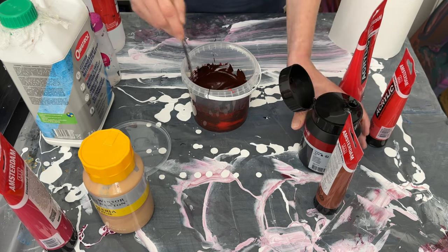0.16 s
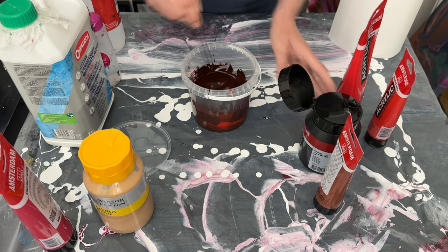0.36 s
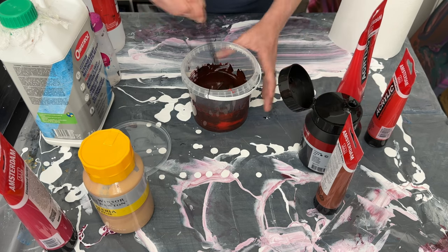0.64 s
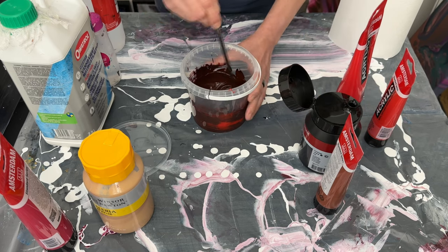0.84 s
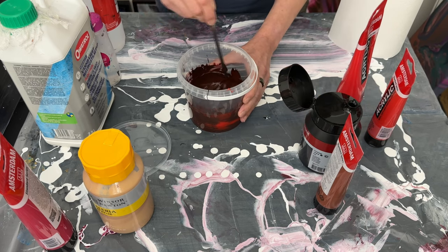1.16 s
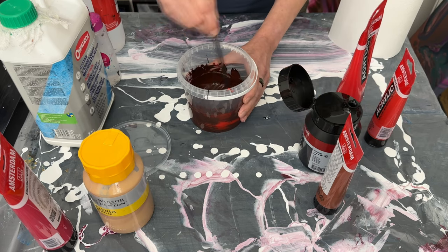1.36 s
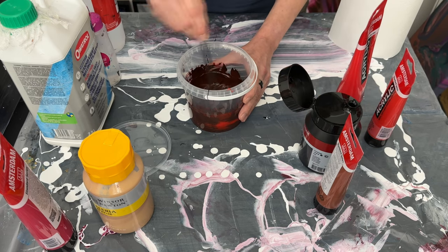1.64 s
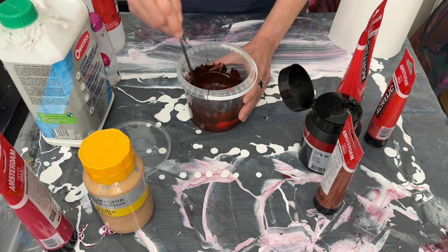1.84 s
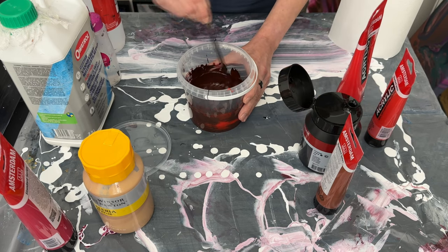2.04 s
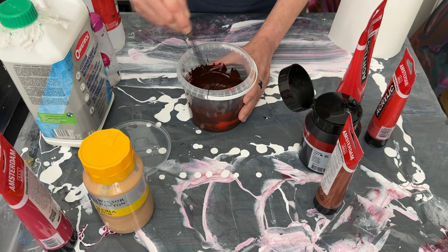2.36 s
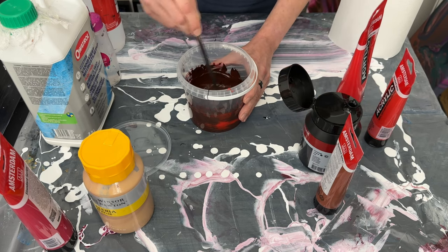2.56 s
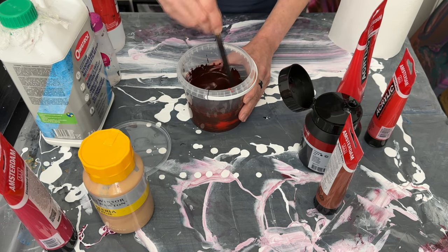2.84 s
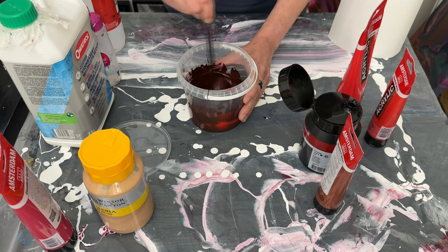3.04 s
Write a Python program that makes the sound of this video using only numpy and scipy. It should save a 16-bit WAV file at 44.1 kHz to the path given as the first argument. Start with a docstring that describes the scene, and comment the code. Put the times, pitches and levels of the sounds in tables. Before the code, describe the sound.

Thick paint is stirred in a plastic tub, close to the microphone in a small room. Irregular hollow knocks and light scrapes from the stick mix with sticky crackles, tiny pops and soft thuds of the tub against a table.

```python
"""Hollow, uneven knocks and wet smacks: a stick stirs thick paint in a thin plastic tub on a table.
The stick knocks on the wall and bottom, making tub and stick ring, and scrapes between knocks.
The paint squelches under the stick, smacks and crackles as it tears, and its air pockets pop.
The tub thumps the table, and the knocks set the things on it ringing faintly.
A small room adds a short echo and a low rumble."""
import sys
import numpy as np
from scipy import signal
from scipy.fft import rfft, irfft, next_fast_len
from scipy.io import wavfile
from scipy.ndimage import map_coordinates

SR = 44100
rng = np.random.default_rng(int(sys.argv[2]) if len(sys.argv) > 2 else 0)


def output_pcm(signal):
    """Save a mono or channel-first signal as 16-bit PCM at the path in sys.argv[1].

    Samples are clipped to [-1, 1] before scaling.
    """
    pcm = np.clip(np.atleast_2d(signal).T, -1, 1) * 32767
    wavfile.write(sys.argv[1], SR, np.round(pcm).astype(np.int16))


N = 141120  # 3.2 seconds

# The tones of the tub, the stick and the things on the table. Fade time is the time to drop 60 dB.
# (pitch [Hz], relative level [dB], fade time [s])
TUB_TONES = [(272, 1.5, 0.023), (385, 2, 0.032), (469.5, 3.5, 0.032), (600, 1, 0.027), (696.7, 2, 0.039),
             (889, -1, 0.026), (1053, 3.5, 0.022), (1218, 6, 0.012)]
STICK_TONES = [(1790, 4.5, 0.014), (1952, 4.5, 0.015), (2385, -5, 0.017), (2840, -4, 0.008),
               (3126, -10, 0.024), (4350, -21, 0.004)]
THINGS_TONES = [(180, -11, 0.43), (431, -11.5, 0.23), (494.7, -2.5, .16), (1020, -7, 0.16), (1146, 1, 0.15),
                (1232, 4, 0.1), (1980, -20, .14), (2980, -31, 0.2)]
# Tone colour of the tick in each knock (frequency [Hz], relative level [dB])
TICK_COLOUR = [(500, -11), (1500, -21), (3000, 6.5), (4400, -0.5), (5500, -16), (8000, -18), (15000, -52)]
# The stick hits the tub, favouring the tones near a centre pitch
# (time [s], tub level [dB], stick level [dB], tub centre [Hz], stick centre [Hz])
KNOCKS = [(.003, -53.5, -54.5, 716, 1900), (0.1766, -39.5, -58.5, 625, 2020), (.358, -47, -55, 670, 2180),
          (.519, -40.5, -52.5, 630, 2600), (.734, -47, -56, 632, 2180), (0.812, -54.5, -59.5, 703, 2950),
          (.847, -51, -82, 680, 2280), (.865, -50.5, -61, 710, 2190), (0.9157, -41, -42.5, 630, 2090),
          (.932, -44, -60, 1004, 2200), (1.116, -52, -54.5, 620, 3200), (1.17, -53, -77, 747, 2830),
          (1.194, -35, -39.5, 926, 2340), (1.212, -39, -53, 830, 2780), (1.222, -40.5, -55, 750, 2340),
          (1.337, -69, -60, 930, 2500), (1.356, -54, -57.5, 920, 2650), (1.391, -51, -82, 740, 2650),
          (1.4751, -32, -36, 950, 2180), (1.484, -36, -41.5, 720, 2700), (1.588, -45.5, -58, 700, 2050),
          (1.607, -44, -52, 740, 2130), (1.667, -51.5, -58, 645, 2110), (1.9194, -40.5, -48.5, 724, 2130),
          (1.939, -38, -45.5, 692, 2650), (2.068, -42, -50.5, 746, 2180), (2.157, -37, -49.5, 656, 1980),
          (2.1882, -44, -51.5, 554, 2690), (2.218, -44.5, -50.5, 680, 2200), (2.3098, -36, -44, 680, 2450),
          (2.339, -47, -45.5, 420, 2890), (2.368, -35.5, -47, 860, 2900), (2.463, -41.5, -49.5, 800, 2350),
          (2.572, -44, -66, 770, 1930), (2.707, -48.5, -61.5, 644, 2090), (2.7125, -48, -61, 850, 2190),
          (2.7822, -48.5, -52.5, 602, 2040), (2.89, -47, -55, 790, 2450), (2.96, -52.5, -54, 727, 2610),
          (3.147, -56, -66, 740, 2530)]
HARD_KNOCK_DB, STICK_ATTACK_S = -41, 0.00021


def knocks():
    """Each knock rings tub and stick, with a tick the paint softens; hard ones shake things nearby."""
    rings, ticks = np.zeros((2, N))
    for start, tub_db, stick_db, tub_hz, stick_hz in KNOCKS:
        lighter_db = HARD_KNOCK_DB - tub_db
        attack_s = 0.00096 * np.exp(.05 * lighter_db)  # lighter knocks start more gently
        things_db = HARD_KNOCK_DB - 15 - 1.2 * lighter_db  # and hardly shake the things nearby
        tub = amp(tub_db + .5) * ring(TUB_TONES, attack_s, tub_hz, focus_db=7)
        things = amp(things_db) * ring(THINGS_TONES, attack_s=0.0018)
        stick = amp(stick_db - 3) * ring(STICK_TONES, STICK_ATTACK_S, stick_hz, focus_db=23.5)
        add(rings, start, tub + things + stick)
        add(ticks, start, amp(stick_db - 5) * soften(burst(fade_s=.02), STICK_ATTACK_S))
    return rings + coloured(ticks, TICK_COLOUR)


def ring(tones, attack_s, centre_hz=1000, focus_db=0):
    """A struck object rings with fading tones, focus_db weaker for each octave away from centre_hz."""
    t = np.arange(SR // 3) / SR
    hz, db, fade_s = np.transpose(tones)[:, :, None]
    spot, flex = rng.standard_normal((2, len(tones), 1))  # each hit lands on a slightly different spot
    gain = amp(db + 1.5 * spot - focus_db * np.abs(np.log2(hz / centre_hz)))
    hz = hz * (1 + .05 * flex * (fade_s < .15))  # short tones shift as the plastic flexes
    waves = np.sin(2 * np.pi * (hz * t + rng.random(hz.shape)))
    sound = soften(np.sum(gain * fade(t, fade_s) * waves, axis=0), attack_s)
    return sound / np.sqrt(np.sum(sound ** 2) / (.01 * SR))  # same total energy every time


# The tub rocks and bumps the table (time [s], level [dB], pitch at the loudest point [Hz])
THUMPS = [(0.178, -47, 265), (.369, -45, 265), (0.52, -37, 254), (.736, -46, 207), (.819, -44, 179),
          (0.848, -42, 200), (0.915, -43.5, 282), (0.948, -43.5, 197), (1.118, -45.5, 176),
          (1.195, -38.5, 236), (1.22, -35.5, 223), (1.338, -40.5, 189), (1.481, -37.5, 200),
          (1.613, -46.5, 225), (1.673, -46.5, 218), (1.923, -41.5, 203), (1.941, -36.5, 201),
          (2.076, -44, 217), (2.162, -46.5, 218), (2.226, -40, 180), (2.314, -38, 221), (2.377, -37, 200),
          (2.469, -43, 275), (2.787, -47, 230), (2.8, -44, 169)]
THUMP_RISE_S, THUMP_SAG_PER_S = 0.0036, 11


def thumps():
    """Pushed by the stick, the full tub bumps the table: a short thud that sinks as the tub settles."""
    track, t = np.zeros(N), np.arange(SR // 16) / SR
    swell = (t / THUMP_RISE_S * np.exp(1 - t / THUMP_RISE_S)) ** 2
    sag = np.exp(-THUMP_SAG_PER_S * (t - THUMP_RISE_S))
    for start, db, hz in THUMPS:
        cycles = hz * np.cumsum(sag) / SR
        add(track, start, amp(db + 1) * swell * np.sin(2 * np.pi * (cycles + rng.random())))
    return track


# How loudly the stick scrapes (time [s], level [dB])
SCRAPE_LEVEL = [(0, -57), (.15, -62.5), (.4, -59), (.65, -64.5), (.85, -62), (1.05, -77), (1.4, -58),
                (1.62, -62.5), (1.75, -68), (1.88, -70.5), (2.1, -63), (2.3, -62.5), (2.55, -72.5),
                (2.8, -70), (3.08, -72.5), (3.2, -66)]
# Tone colour of the scraped plastic (frequency [Hz], relative level [dB])
SCRAPE_COLOUR = [(100, -25.5), (200, 5.5), (450, -6.5), (700, 2), (900, -11.5), (1200, 0.5), (1550, -4.5),
                 (2000, -6), (2800, -13.5), (4000, -14.5), (8000, -26), (16000, -30.5)]


def scrape():
    """The stick slips along the plastic in tiny jerks."""
    slips = grains(per_s=1800, spread_db=4, clump_db=3, clumps_per_s=30)
    return amp(curve(SCRAPE_LEVEL) - 1.5) * coloured(slips, SCRAPE_COLOUR)


# The stick drags hard along the wet wall (time [s], length [s], level [dB], pitch of the hollow [Hz])
DRAGS = [(0.916, .04, -49.5, 2430), (1.202, .022, -49.5, 2100), (1.778, 0.043, -60, 2450),
         (2.043, .06, -58.5, 2050), (2.314, .02, -51, 2700), (2.35, 0.034, -47.5, 2750),
         (2.65, 0.032, -61, 2040), (2.879, 0.077, -55, 2580), (3.152, 0.025, -61.5, 2420)]
# Tone colour of squeezed paint (frequency [Hz], relative level [dB])
SQUELCH_COLOUR = [(400, -3.5), (800, 11.5), (1200, 4), (1550, 3), (1950, 6), (2600, 1.5), (3400, -7),
                  (4300, -13), (5200, -10), (10000, -25.5), (16000, -28)]


def squelches():
    """Pressed to the wall, the stick squeezes out paint; the hollow left behind it adds a pitch."""
    track = np.zeros(N)
    slips = grains(per_s=6000, spread_db=3, clump_db=2.5, clumps_per_s=140)
    squeeze = coloured(slips, SQUELCH_COLOUR)
    for start, length, db, hz in DRAGS:
        stroke = squeeze[round(start * SR):][:int(length * SR) + 2]
        hollow = amp(1.5) * signal.lfilter(*signal.iirpeak(hz, Q=5.8, fs=SR), stroke)
        add(track, start, amp(db) * unit(stroke + hollow) * signal.windows.tukey(len(stroke), .5))
    return track


# How loudly the paint crackles (time [s], level [dB])
CRACKLE_LEVEL = [(0, -58), (.2, -86), (.65, -114), (.8, -73), (.93, -52.5), (1.03, -69), (1.2, -66),
                 (1.3, -82), (1.45, -61), (1.6, -74), (1.85, -74), (2.1, -88), (2.24, -92), (2.52, -84),
                 (2.68, -68), (2.85, -66), (2.93, -61), (3.05, -70), (3.2, -67)]
# Single wet smacks (time [s], level [dB], centre pitch [Hz])
SMACKS = [(0.022, -51, 6300), (0.0875, -43.5, 10500), (0.121, -48, 11000), (0.167, -45, 6100),
          (0.1882, -40, 9200), (0.3366, -43.5, 6400), (0.72, -43, 6750), (0.729, -34.5, 8160),
          (0.8111, -43, 6600), (0.8646, -44, 11000), (0.917, -37.5, 9700), (1.1136, -39.5, 9700),
          (1.3565, -36, 9600), (1.4743, -39, 9400), (1.651, -46, 7300), (1.906, -30.5, 9140),
          (2.1933, -37.5, 6420), (2.2162, -32, 7000), (2.243, -40, 6750), (2.3692, -30.5, 10700),
          (2.673, -47.5, 9000), (2.727, -43.5, 6600), (2.7663, -49.5, 9860), (2.901, -44, 6730),
          (2.933, -38.5, 10100), (3.126, -46, 11000), (3.157, -45, 6540)]
# Tone colour of tearing paint (frequency [Hz], relative level [dB])
PAINT_COLOUR = [(1000, -10), (3000, -8), (6500, 3), (8000, -6), (9600, 5.5), (11500, -3), (13000, -0.5),
                (16000, 4)]


def tearing_paint():
    """Thin films of paint tear: single smacks, each with its own colour, over a fine crackle."""
    crackle = grains(per_s=600, spread_db=8, clump_db=3, clumps_per_s=50)
    track = amp(curve(CRACKLE_LEVEL) - 7.5) * crackle
    for start, db, hz in SMACKS:
        tear = soften(burst(fade_s=.005), attack_s=.0007)
        smack = signal.lfilter(*signal.iirpeak(hz, Q=1.7, fs=SR), tear)
        add(track, start, amp(db + 1.5) * smack)
    return coloured(track, PAINT_COLOUR)


# Air pockets pop in the paint (time [s], pitch [Hz], level [dB])
POCKETS = [(0.342, 1940, -35.5), (0.721, 2650, -45), (0.729, 3640, -40.5), (0.915, 2060, -55),
           (1.063, 783, -41.5), (1.116, 2660, -37.5), (1.214, 4030, -33.5), (1.786, 2400, -42.5),
           (1.897, 9670, -41.5), (2.088, 1940, -36.5), (2.188, 4140, -40.5), (2.339, 4200, -35),
           (2.366, 4060, -33), (2.909, 2990, -33.5)]
POCKET_RISE_PER_S, POCKET_ROUGHNESS = 3.3, .4


def air_pockets():
    """A small pocket opens and rings for a moment, rough and slightly rising in pitch."""
    track, t = np.zeros(N), np.arange(SR // 16) / SR
    shape = soften(fade(t, fade_s=.011), attack_s=.00069)
    for start, hz, db in POCKETS:
        flutter = POCKET_ROUGHNESS * rng.standard_normal(len(t))
        phase = 2 * np.pi * hz * np.cumsum(1 + POCKET_RISE_PER_S * t + flutter) / SR
        add(track, start, amp(db) * shape * np.sin(phase))
    return track


# Echoes off the table and bottles (delay [s], left gain [ratio], right gain [ratio])
ECHOES = [(.0045, -0.031, -0.29), (.0088, -0.022, 0.037), (0.0131, -0.21, 0.22), (0.0195, -0.11, -0.082)]
# How much louder the left ear hears the tub (frequency [Hz], level above the right ear [dB])
LEFT_LOUDER = [(200, -1), (500, 2.2), (1000, 2.5), (2000, 3), (4000, 7.5), (8000, 7.5), (14000, -2.5)]
LEFT_LEAD_S = .000015


def close_sound(x):
    """The sound reaches the left ear just before the right, and bounces off nearby surfaces."""
    side = np.array([[1], [-1]])

    def response(hz):
        delay = lambda seconds: np.exp(-2j * np.pi * hz * seconds)
        direct = amp(side * along(LEFT_LOUDER, hz) / 2) * delay(-side * LEFT_LEAD_S / 2)
        echoes = sum(np.array([[left], [right]]) * delay(lag) for lag, left, right in ECHOES)
        return direct * (1 + echoes)
    return filtered(np.array([x, x]), response)


# How long the room rings (frequency [Hz], fade time [s])
ROOM_FADE = [(150, 0.3), (700, 0.3), (2500, 0.24), (10000, 0.16)]
# Tone colour of the room's echo (frequency [Hz], relative level [dB])
ROOM_COLOUR = [(100, 2.5), (300, -11), (520, -6), (720, -5), (1200, -3), (2500, -6), (5000, 0), (12000, 1)]
# How alike that echo is in both ears (frequency [Hz], likeness [-1 to 1])
ROOM_LIKENESS = [(100, 0.95), (250, 0.96), (500, 0.41), (1000, -0.08), (2000, 0.45), (5000, -0.15),
                 (12000, 0.5)]


def room_echo(x):
    """Many reflections blur into a short, diffuse room tail."""
    echo, block = np.zeros((2, N)), SR // 11
    for first in range(0, N, block):
        hz, t, noise = signal.stft(rng.standard_normal((2, SR // 2)), SR, nperseg=256)
        shape = fade(t, along(ROOM_FADE, hz)[:, None]) * (1 - np.exp(-t / 0.0018))
        tail = signal.istft(noise * shape, SR, nperseg=256)[1]
        tail /= np.linalg.norm(tail[0])
        add(echo, first / SR, signal.fftconvolve(x[None, first:first + block], tail, axes=1))
    return stereo(echo, ROOM_COLOUR, ROOM_LIKENESS)


# Tone colour of the background noise (frequency [Hz], relative level [dB])
RUMBLE_COLOUR = [(20, -23), (33, -42), (44, 10), (68, 9), (90, -4.5), (125, 0.5), (160, -6.5), (300, -7.5),
                 (700, -16), (1500, -29), (3000, -25.5), (4500, -29.5), (7000, -24), (8000, -46),
                 (10000, -61), (16000, -40)]
# How alike that noise is in both ears (frequency [Hz], likeness [-1 to 1])
RUMBLE_LIKENESS = [(60, 0.96), (250, 0.89), (600, 0.17), (3000, 0.079), (10000, 0.13)]
RUMBLE_DB = -57.5


def room_rumble():
    """A steady low rumble with a faint hiss."""
    return amp(RUMBLE_DB) * unit(stereo(rng.standard_normal((2, N)), RUMBLE_COLOUR, RUMBLE_LIKENESS))


def amp(db):
    """Turn decibels into a number to multiply by."""
    return 10 ** (np.asarray(db) / 20)


def unit(x):
    """Scale a sound to an average (rms) strength of 1."""
    return x / np.sqrt(np.mean(x ** 2) + 1e-20)


def along(points, hz):
    """Read between (frequency, value) points on a log frequency scale."""
    frequencies, values = np.transpose(points)
    return np.interp(np.log(hz + 1), np.log(frequencies + 1), values)


def curve(points):
    """Join (time, value) points with straight lines, one value per sample."""
    return np.interp(np.arange(N) / SR, *np.transpose(points))


def fade(t, fade_s):
    """Fall by 60 dB every fade_s seconds."""
    return np.exp(-np.log(1000) * t / fade_s)


def soften(x, attack_s):
    """Round off the start of a sound."""
    return x * (1 - np.exp(-np.arange(len(x)) / SR / attack_s))


def burst(fade_s):
    """A short puff of dying noise."""
    t = np.arange(SR // 10) / SR
    return rng.standard_normal(len(t)) * fade(t, fade_s)


def grains(per_s, spread_db, clump_db, clumps_per_s):
    """Tiny random clicks of uneven size, in louder and quieter clumps."""
    clicks = (rng.random(N) < per_s / SR) * rng.choice([-1, 1], N)
    sizes = np.clip(rng.standard_normal(N), -2, 2)
    clumps = map_coordinates(rng.standard_normal(1024), [np.arange(N) * clumps_per_s / SR], mode="wrap")
    return unit(clicks * amp(spread_db * sizes + clump_db * clumps))


def add(track, start, sound):
    """Mix a sound into a track, start seconds in."""
    part = track[..., max(0, round(start * SR)):][..., :sound.shape[-1]]
    part += sound[..., :part.shape[-1]]


def filtered(x, response):
    """Multiply each frequency in a sound by response(hz)."""
    size = next_fast_len(N + SR // 2)
    return irfft(rfft(x, size) * response(np.fft.rfftfreq(size, 1 / SR)), size)[..., :x.shape[-1]]


def coloured(x, colour):
    """Give a sound a tone colour, with a filter that rings only after each click."""
    size = 2048
    cepstrum = irfft(np.log(amp(along(colour, np.fft.rfftfreq(size, 1 / SR)))))
    cepstrum[1:size // 2] *= 2  # move the ringing from before the click to after it
    cepstrum[size // 2 + 1:] = 0
    kernel = irfft(np.exp(rfft(cepstrum)))
    return signal.fftconvolve(x, kernel / np.linalg.norm(kernel))[:N]


def stereo(pair, colour, likeness):
    """Blend two unrelated sounds into a left and right of the given colour and likeness."""
    def response(hz):
        angle = np.arccos(np.clip(along(likeness, hz), -1, 1)) / 2
        return amp(along(colour, hz)) * [np.cos(angle), np.sin(angle)]
    mid, side = filtered(pair, response)
    return np.array([mid + side, mid - side])


def scene():
    """The stirring, heard close up in its small room."""
    stirring = knocks() + thumps() + scrape() + squelches() + tearing_paint() + air_pockets()
    return close_sound(stirring) + room_echo(stirring) + room_rumble()


TOP_HZ = 15900


def record(dry):
    """Cut off the very highest treble, above TOP_HZ."""
    return filtered(dry, lambda hz: hz < TOP_HZ)


dry = scene()
out = record(dry)
output_pcm(out)
```